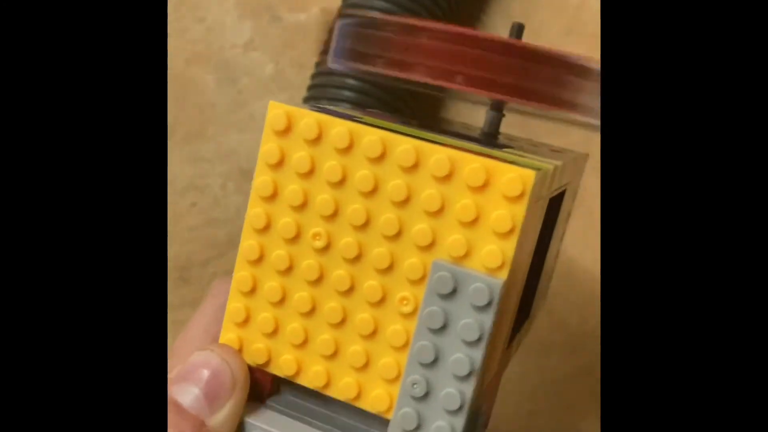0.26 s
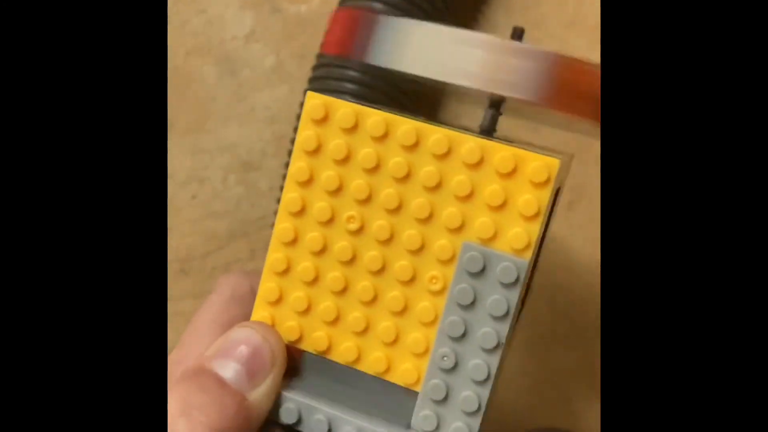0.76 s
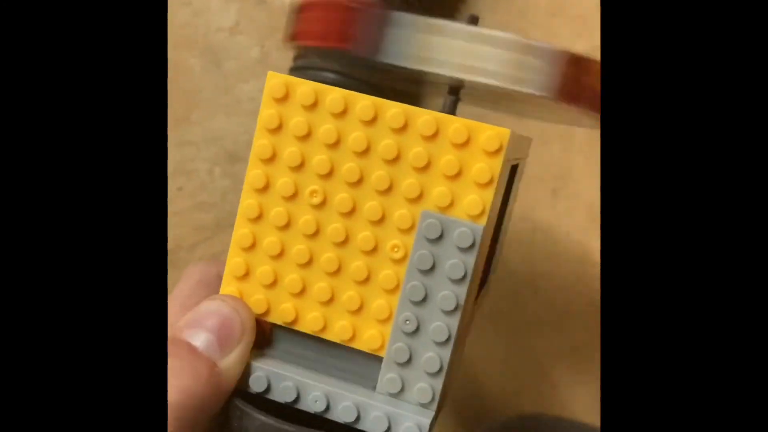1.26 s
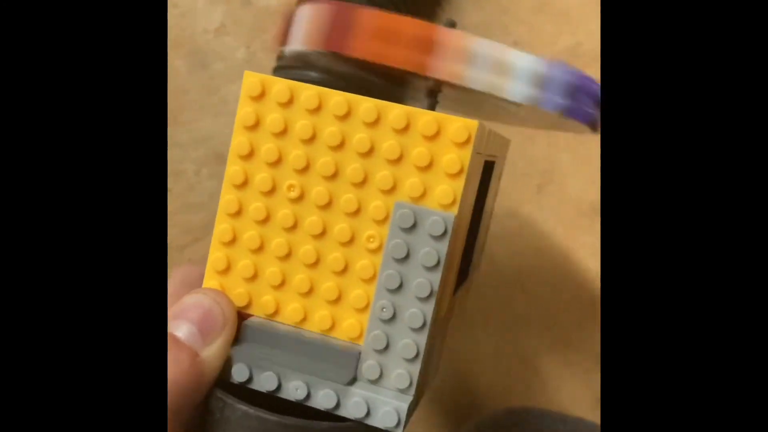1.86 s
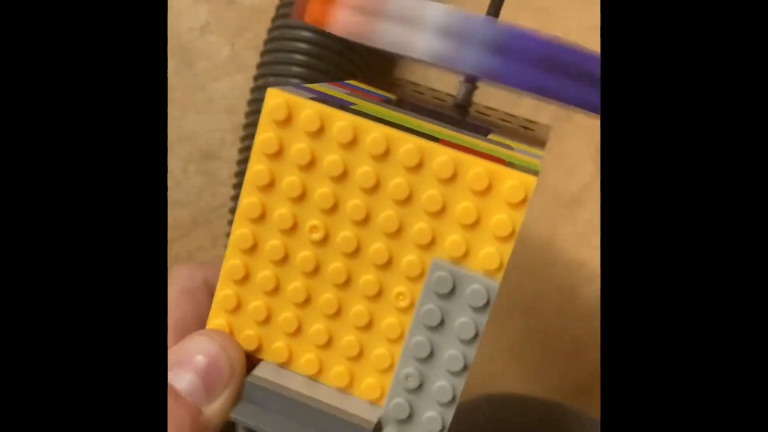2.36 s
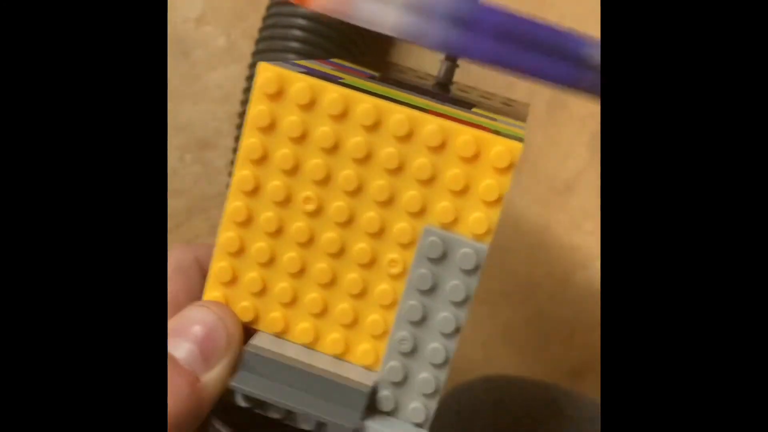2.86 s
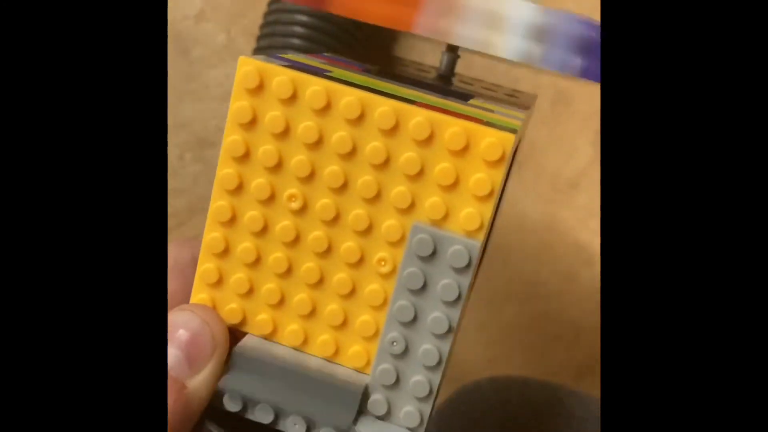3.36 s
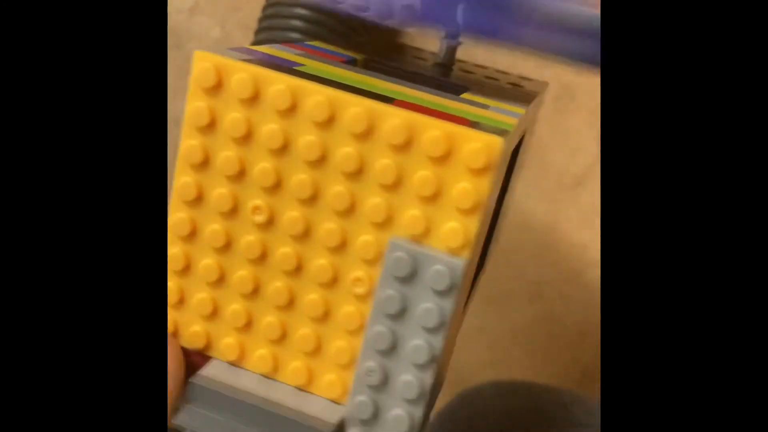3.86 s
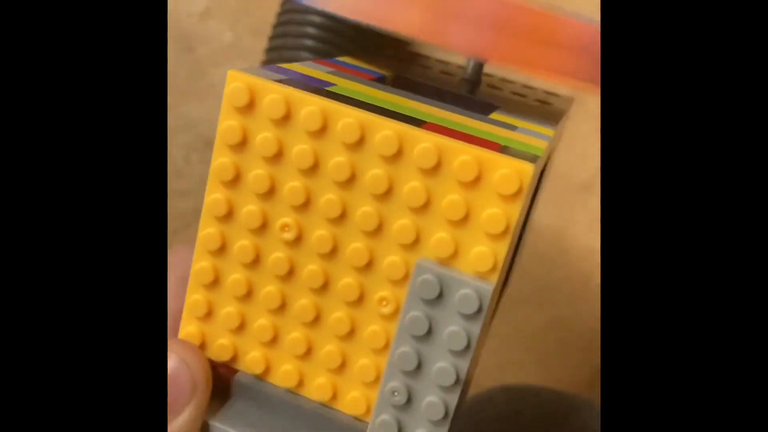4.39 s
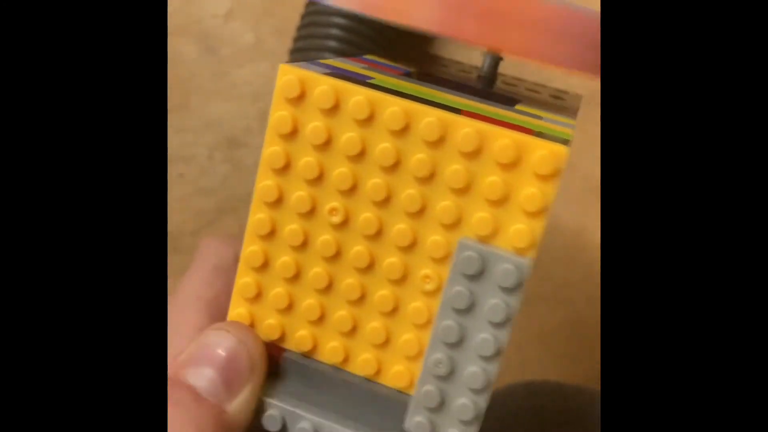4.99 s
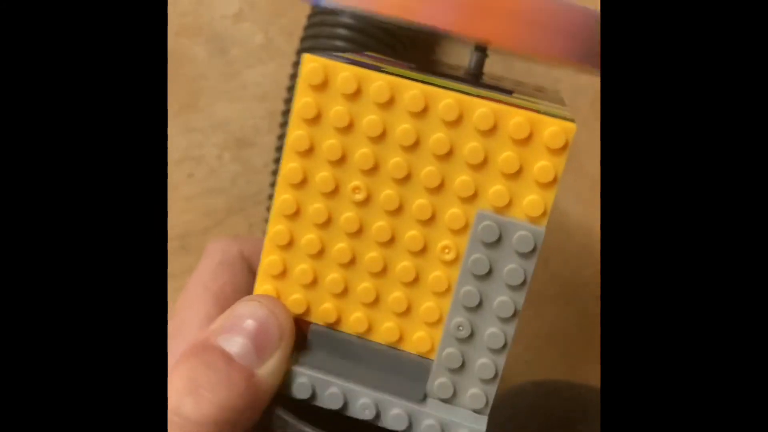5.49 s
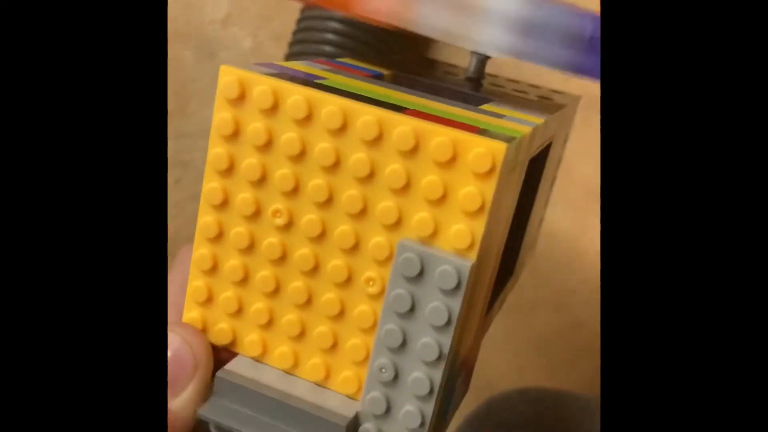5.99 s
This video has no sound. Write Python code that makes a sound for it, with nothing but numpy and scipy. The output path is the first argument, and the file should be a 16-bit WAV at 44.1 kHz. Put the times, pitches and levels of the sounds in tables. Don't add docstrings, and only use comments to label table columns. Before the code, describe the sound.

A shop vacuum whines and roars indoors while a small plastic piston engine clatters fast and evenly, squeaking each turn, with hissing air leaks.

```python
import sys
import numpy as np
from scipy import signal
from scipy.fft import rfft, irfft, next_fast_len
from scipy.io import wavfile
from scipy.ndimage import uniform_filter1d, map_coordinates

SR = 44100
rng = np.random.default_rng(int(sys.argv[2]) if len(sys.argv) > 2 else 0)


def digitize_waveform(pressure):
    field = np.atleast_2d(pressure).T
    bounded = np.clip(field, -1, 1)
    quanta = np.round(bounded * 32767).astype(np.int16)
    wavfile.write(sys.argv[1], SR, quanta)


def voltage_ratio(level):
    return 10 ** (np.asarray(level, float) / 20)


N = 275184
SIZE = next_fast_len(N)
HZ = np.arange(SIZE // 2 + 1) * SR / SIZE + 1e-3
TIME = np.arange(N) / SR

# time [s], shaft speed [Hz], shaft tone [dB], hose gusts [dB].
MOTOR = [(0, 361, -28.5, -44), (.1, 364.6, -27.5, -44), (.68, 365.3, -28, -43), (1.13, 358.6, -29.5, -44),
         (1.25, 354, -24.5, -38.5), (1.7, 349.3, -28.5, -38.5), (2.3, 347, -33, -38),
         (2.85, 346, -34.5, -34.5), (3.42, 345.7, -34.5, -39), (3.55, 347.4, -32, -48.5),
         (3.77, 352, -26.5, -47), (4.05, 361.7, -29, -48.5), (4.8, 364.3, -29, -43.5),
         (5.3, 363.4, -28, -46.5), (5.42, 356.6, -26.5, -46), (5.7, 354.5, -26.5, -45.5),
         (6.12, 364, -29.7, -47), (6.24, 360, -29, -43)]
# frequency [Hz], density [dB per Hz].
HOSE_COLOUR = [(20, -52), (32, -38), (42, -20), (55, -4), (67, -1), (95, 1.5), (125, -11.5), (250, -17.5),
               (460, -11), (520, -34)]
CABINET_COLOUR = [(40, -73), (70, -27), (110, -8), (185, 3.5), (270, -6.5), (430, -3.5), (520, -18),
                  (800, -56)]
FAN_COLOUR = [(200, -65), (550, -9.5), (930, -0.5), (1100, -5.5), (1400, -0.5), (2150, -2.5), (2750, -11),
              (3230, -7.5), (3550, -8), (6000, -11.5), (9700, -14), (12000, -12.5), (13500, -32),
              (16000, -21)]
LEAK_COLOUR = [(1200, -40), (2500, -1.5), (4000, -7.5), (5000, -12.5), (7500, -5), (8700, -1), (9700, 1),
               (11000, 2), (12500, 1.5), (13700, -4), (14500, -2.5), (16500, -15)]
# time [s], leak hiss [dB].
LEAK_OPENING = [(0, -52), (.45, -46), (.58, -34.5), (1.04, -30), (1.74, -33.5), (2.05, -32.5), (3.3, -33.5),
                (3.52, -35), (3.75, -40), (4.05, -51), (4.8, -47), (5.02, -54), (5.11, -34), (5.29, -31),
                (5.38, -32.5), (5.56, -32.5), (5.8, -51), (6.24, -51.5)]
# knock time [s], piston ring [dB], rub of the piston [dB], housing knock [dB].
CRANK_TURNS = [(.064, -18.5, -21.5, -25), (.414, -17.5, -20.5, -22), (.774, -20, -25, -23.5),
               (1.153, -25, -17.5, -24), (1.569, -21, -15, -24.5), (2.019, -22.5, -15, -26),
               (2.503, -22, -30, -27), (3.013, -18, -31, -22.5), (3.527, -21.5, -30, -29.5),
               (3.968, -23, -18.5, -26), (4.344, -15, -22.5, -24.5), (4.703, -18, -22, -27),
               (5.06, -18.5, -19.5, -27), (5.437, -22, -24, -23), (5.851, -19.5, -21.5, -23.5),
               (6.227, -19.5, -21, -22.5)]
# frequency [Hz], width [Hz], level [dB].
PISTON_MODES = [(2035, 130, 0)]
HOUSING_MODES = [(830, 90, -3), (955, 90, 0)]
VALVE_MODES = [(1260, 350, -1), (1650, 550, -1), (3250, 700, -12), (7000, 6000, -26)]
# frequency [Hz], left minus right [dB], likeness [0-1], lead of the left [turns].
MICROPHONE_PORTS = [(60, -2.5, .995, 0), (200, -1.5, .995, 0), (420, 0, .99, 0), (700, -6, .7, -.45),
                    (1000, -5, .8, 0), (1350, -2, .6, .18), (2000, -6, .55, .15), (3100, -1, .65, .35),
                    (3800, -2, .55, .24), (4900, -.5, .6, .4), (5700, 0, .86, .5), (8300, 0, .84, 1),
                    (11850, 0, .91, 1.5), (14400, 0, .9, 2), (16000, 0, .9, 2)]
IMAGE_BANDS = np.r_[216, 240, 264, 292, 320:769:32]

TURNS_PER_ROW = 3
FULL_SPEED_S = .118


def along(table, column=1, warp=np.log):
    rows = np.array(table, float)
    return np.interp(warp(HZ), warp(rows[:, 0]), rows[:, column])


def walk(rate):
    hold = int(SR / rate)
    steps = np.repeat(rng.standard_normal(N // hold + 1), hold)
    return 1.01 * uniform_filter1d(uniform_filter1d(steps, hold), hold)[:N]


def motor_curves():
    s, *columns = np.transpose(MOTOR)
    return [np.interp(TIME, s, column) for column in columns]


def whine():
    free_hz = 365
    hz, tone_db, _ = motor_curves()
    second_db = -40 + 0.325 * (free_hz - hz)
    second_db = second_db + np.clip(hz - 350, 4, 15) / 5 * walk(4)
    shaft = 2 * np.pi * np.cumsum(hz * (1 + 0.0014 * walk(29.96))) / SR
    first = np.sin(shaft + np.array([[.15], [0]])) * voltage_ratio([[.4], [-.4]])
    first = first * voltage_ratio(tone_db + 0.67 * walk(40))
    second = voltage_ratio(second_db + 2.4 * walk(9.6)) * np.sin(2 * shaft) * np.array([[-.3], [1]])
    upper = voltage_ratio(second_db - 10.0) * np.sin(4 * shaft) + voltage_ratio(second_db - 21) * np.sin(3 * shaft)
    return np.sqrt(2) * (first + second + upper * np.array([[.3], [1]]))


def air(colour, flicker_db, rate):
    out = np.zeros((2, N))
    gain = voltage_ratio(along(colour))
    waves = rfft(rng.standard_normal((2, SIZE))) * gain
    for octave in range(4, 16):
        share = np.clip(1 - abs(np.log2(HZ) - octave), 0, 1)
        if share @ gain < .01 * share.sum():
            continue
        out += irfft(waves * share, SIZE)[:, :N] * voltage_ratio(flicker_db * walk(rate))
    return out / np.sqrt(np.mean(out ** 2))


def turns():
    s, *strengths_db = np.transpose(CRANK_TURNS)
    row = np.arange((len(s) - 1) * TURNS_PER_ROW + 1) / TURNS_PER_ROW
    padded = np.pad(s, 4, mode="reflect", reflect_type="odd")
    knock_s = map_coordinates(padded, [row + 4])
    period = np.diff(knock_s, prepend=knock_s[0] - FULL_SPEED_S)
    return knock_s, period, *(np.interp(knock_s, s, db) for db in strengths_db)


def airflow():
    throb_db = motor_curves()[2]
    rumble_db = -36 + .3 * (throb_db - throb_db.mean()) + .7 * walk(6)
    roar_db = -31.5 - 0.4032 * TIME
    leak_db = np.interp(TIME, *np.transpose(LEAK_OPENING))
    knock_s = turns()[0]
    turn = np.interp(TIME, knock_s, np.arange(len(knock_s)))
    valve = np.exp(1.6 * (np.cos(2 * np.pi * (turn + 0.0077)) - 1))
    strokes = np.exp(3.3 * (np.cos(4 * np.pi * (turn + 0.062)) - 1))
    throb = voltage_ratio(throb_db + 3.5) * air(HOSE_COLOUR, 1.6, 9)
    rumble = voltage_ratio(rumble_db + 2.1) * air(CABINET_COLOUR, 0.34, 9.2)
    roar = voltage_ratio(roar_db + 4.5 + 1.9 * valve + 1.05 * strokes) * air(FAN_COLOUR, 0.85, 13)
    leak = voltage_ratio(leak_db + 7.5 + 3.93 * valve) * air(LEAK_COLOUR, 0.46, 14)
    return throb + rumble + roar + leak


def squeaks(times, peak_db, squeak_hz, half_s=0.0019):
    out = np.zeros((2, N))
    chance = rng.standard_normal((len(times), 2))
    for s, db, hz, (tune, phase) in zip(times, peak_db, squeak_hz, chance):
        near = slice(*np.searchsorted(TIME, [s - .012, s + .012]))
        age = TIME[near] - s
        squeal = np.exp(-abs(age / half_s) ** 3)
        ring_off = voltage_ratio(-9) * (age > 0) * (age / half_s) * np.exp(1 - abs(age / half_s) ** 1.5)
        pitch = 2 * np.pi * hz * (1 + 0.0035 * tune + 3.4 * age) * age
        wave = np.sin(pitch + np.array([[0], [phase]]))
        out[:, near] += np.sqrt(2) * voltage_ratio(db) * (squeal + ring_off) * wave
    return out


def piston_rub():
    s, period, _, rub_db, _ = turns()
    squeak_s = s - .256 * period
    squeak_db = rub_db + 1.3 * rng.standard_normal(len(s))
    squeak_hz = 9706 - 5000 * (period - FULL_SPEED_S)
    main = squeaks(squeak_s, squeak_db - 2, squeak_hz)
    return main + squeaks(squeak_s + .125 * period, squeak_db - 17, .96 * squeak_hz)


def ring(push, modes):
    out = 0
    for hz, width, db in modes:
        peak = signal.iirpeak(hz, hz / width, SR)
        once = signal.lfilter(*peak, push)
        out = out + voltage_ratio(db) * signal.lfilter(*peak, once)
    return out


def blows(times, peak_db, modes, rattle_s):
    size = 2048
    out = np.zeros((2, N + 4096))
    age = np.arange(size) / SR
    chance = rng.standard_normal((len(times), 2, size))
    for s, db, grit in zip(times, peak_db, chance):
        hit = ring(grit * np.exp(-(age / rattle_s - 2) ** 2), modes)
        hit = hit / abs(hit).max(axis=1, keepdims=True)
        start = max(int((s - 2.5 * rattle_s) * SR), 0)
        out[:, start:start + size] += hit * voltage_ratio(db) * np.sqrt(2)
    return out[:, :N]


def clatter():
    s, period, _, _, housing_db = turns()
    chance = rng.standard_normal((3, len(s)))
    slower = period - FULL_SPEED_S
    slap_db = np.maximum(-20.5 - 480 * slower, -38) + 1.8 * chance[0]
    housing_db = housing_db + 1.8 * chance[1]
    back_s = s - period * (.53 + 1.4 * slower)
    back_db = -19 - 90 * slower + 1.2 * chance[2]
    slap = blows(s - .0125, slap_db + 5, VALVE_MODES, .0007)
    knock = blows(s - .004, housing_db, HOUSING_MODES, 0.001484)
    rattle = blows(s + .001, back_db - 3, VALVE_MODES, .0035)
    back_rattle = blows(back_s, back_db, VALVE_MODES, .0025)
    back_knock = blows(back_s - .004, back_db - 12, HOUSING_MODES, 0.000976)
    return slap + knock + rattle + back_rattle + back_knock


def piston():
    s, _, ring_db = turns()[:3]
    ring_db = ring_db + 1.5 * rng.standard_normal(len(s))
    return blows(s - .002, ring_db, PISTON_MODES, .0017) * voltage_ratio([[-15], [0]])


def scene():
    direct, other = rfft(airflow() + piston_rub() + clatter(), SIZE)
    like = along(MICROPHONE_PORTS, column=2)
    lead = np.exp(2j * np.pi * along(MICROPHONE_PORTS, column=3, warp=np.abs))
    left = like * direct * lead + np.sqrt(1 - like ** 2) * other
    left = left * voltage_ratio(along(MICROPHONE_PORTS))
    ports = irfft(np.array([left, direct]), SIZE)[:, :N]
    return ports + whine() + piston()


def joint_stereo(x, gap_db=8.5):
    top_hz, lead_in = 15740, 1024 - 277
    frames = dict(fs=SR, window="cosine", nperseg=2048, noverlap=1024)
    mid_side = np.array([x[0] + x[1], x[0] - x[1]]) / 2
    hz, _, pair = signal.stft(np.pad(mid_side, ((0, 0), (lead_in, 0))), **frames)
    for lo, hi in zip(IMAGE_BANDS, IMAGE_BANDS[1:]):
        power = np.sum(abs(pair[:, lo:hi]) ** 2, axis=1)
        strong_enough = power * voltage_ratio(2 * gap_db) > power[::-1]
        pair[:, lo:hi] *= strong_enough[:, None]
    pair[:, hz > top_hz] = 0
    mid, side = signal.istft(pair, **frames)[1][:, lead_in:][:, :N]
    return np.array([mid + side, mid - side])


def roll_off(x):
    return signal.sosfilt(signal.butter(12, 16740, fs=SR, output="sos"), x)


def record(dry):
    mix = joint_stereo(dry)
    return roll_off(mix)


dry = scene()
out = record(dry)
digitize_waveform(out)
```